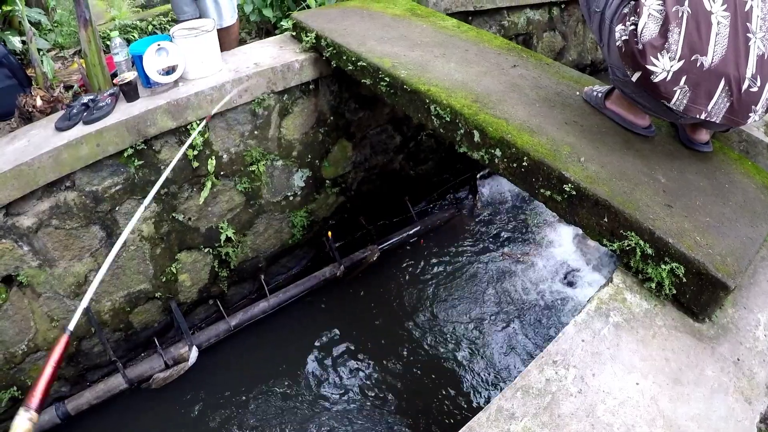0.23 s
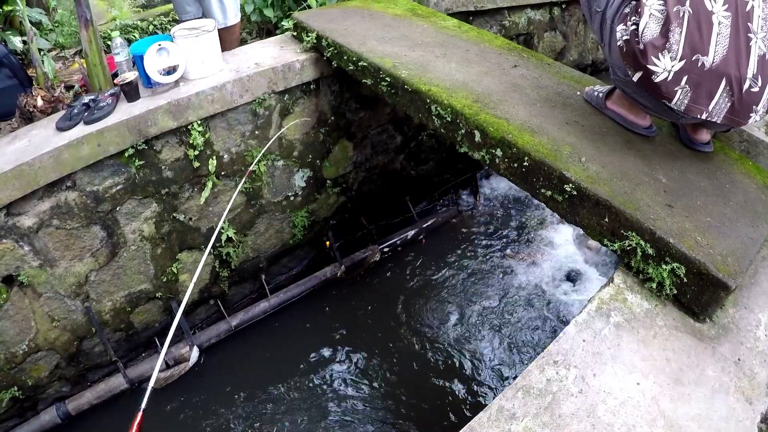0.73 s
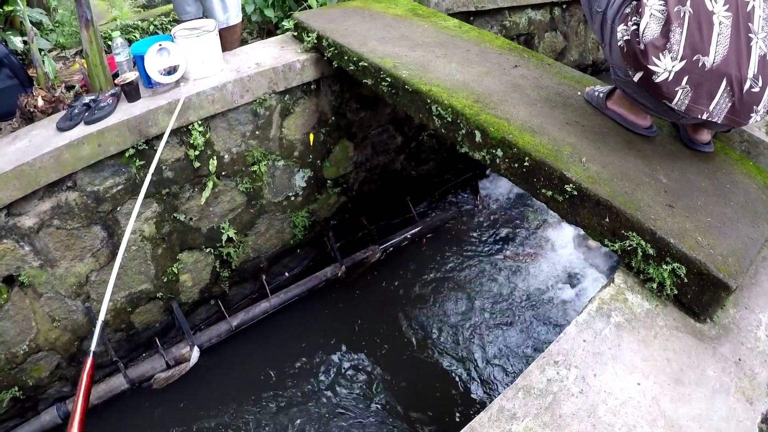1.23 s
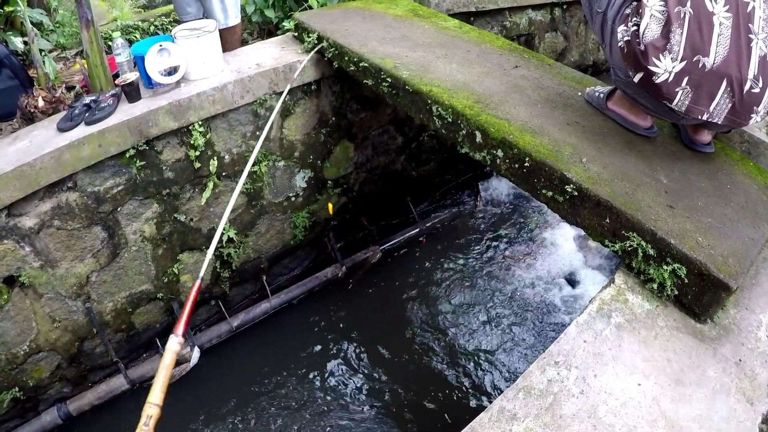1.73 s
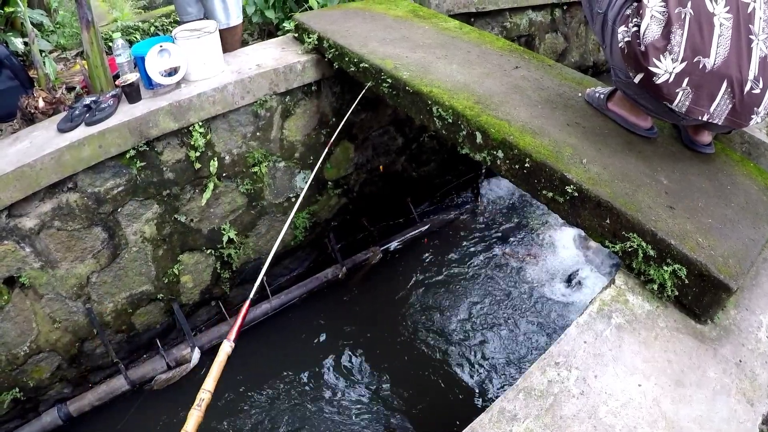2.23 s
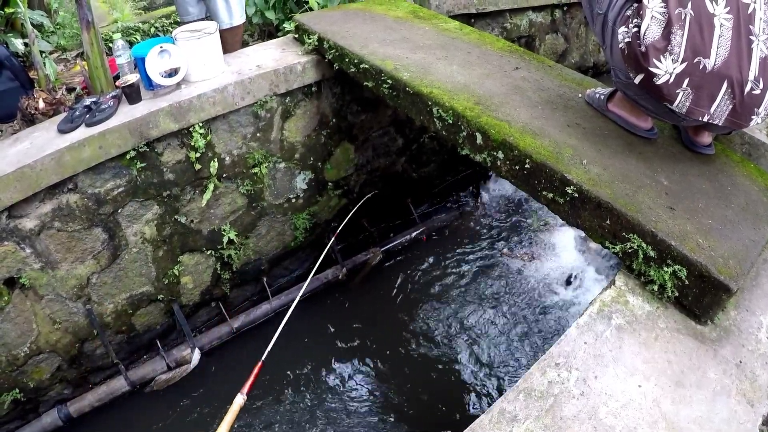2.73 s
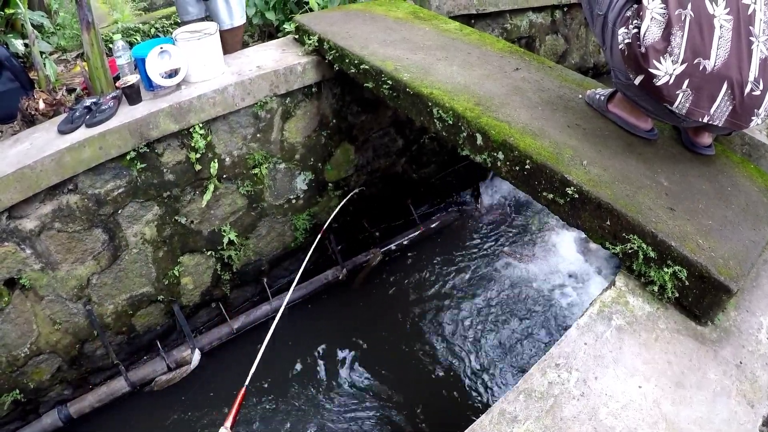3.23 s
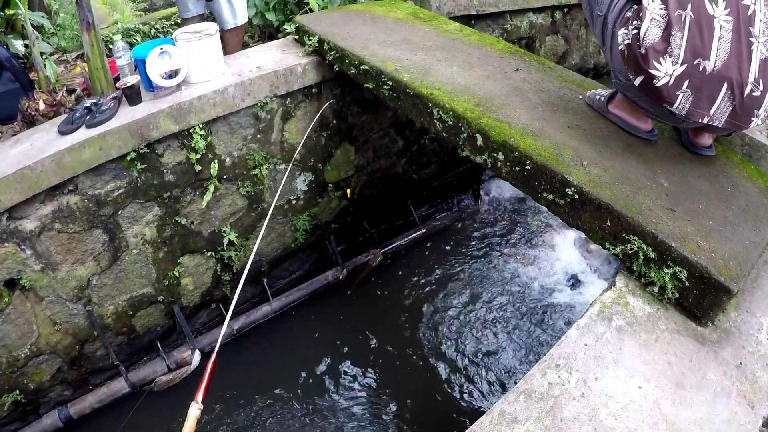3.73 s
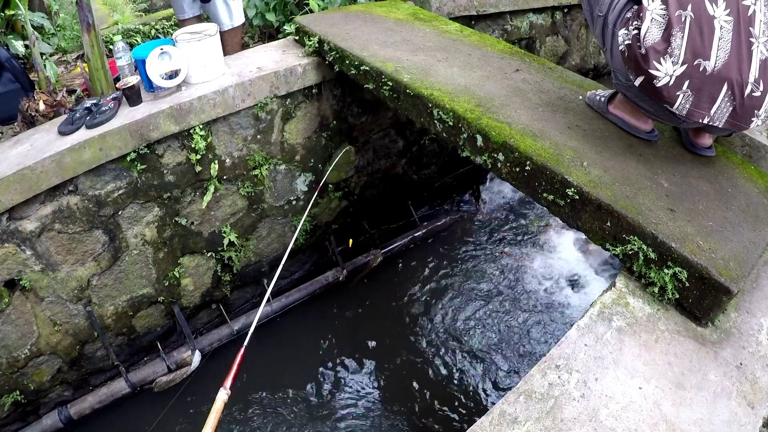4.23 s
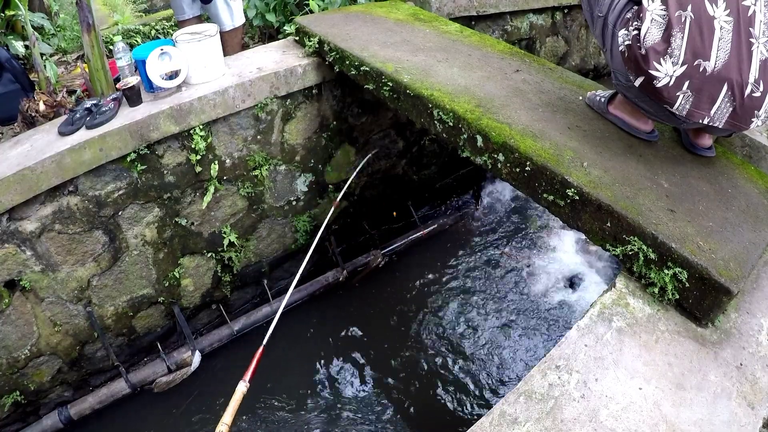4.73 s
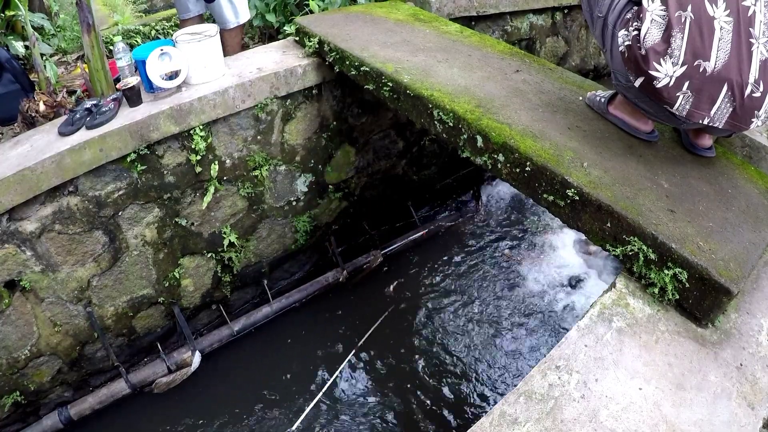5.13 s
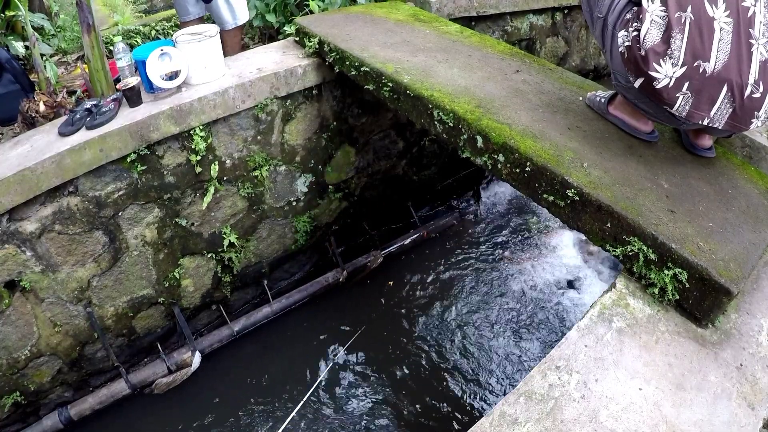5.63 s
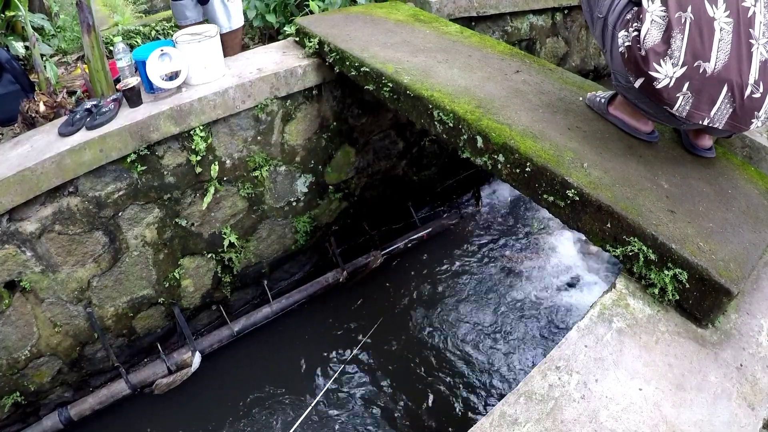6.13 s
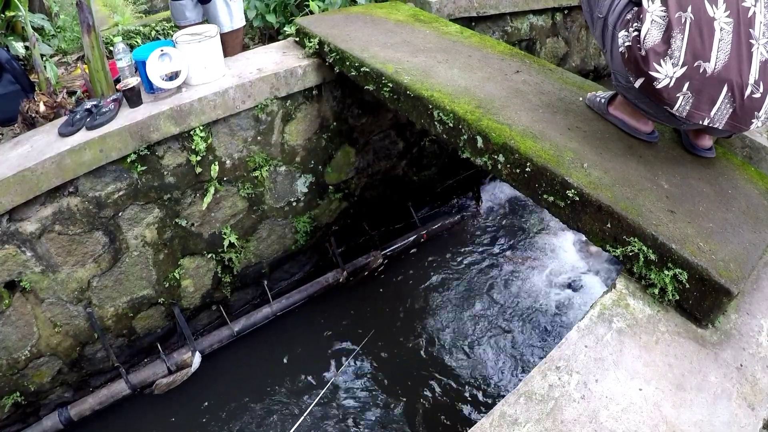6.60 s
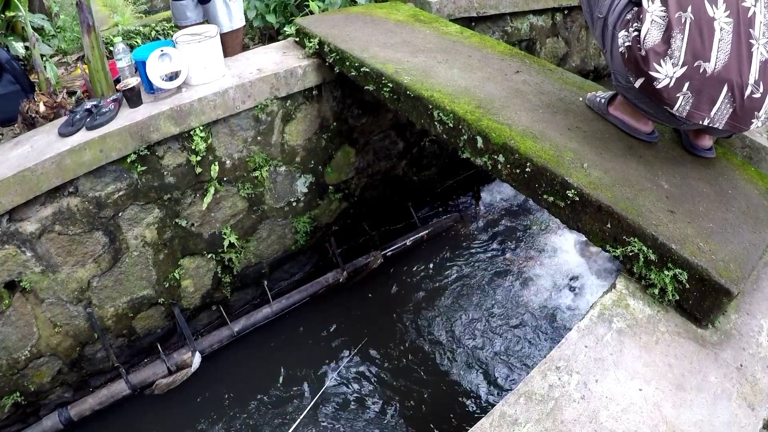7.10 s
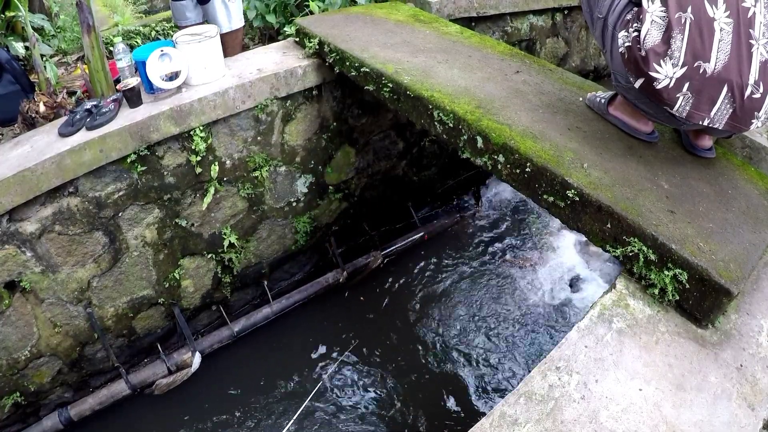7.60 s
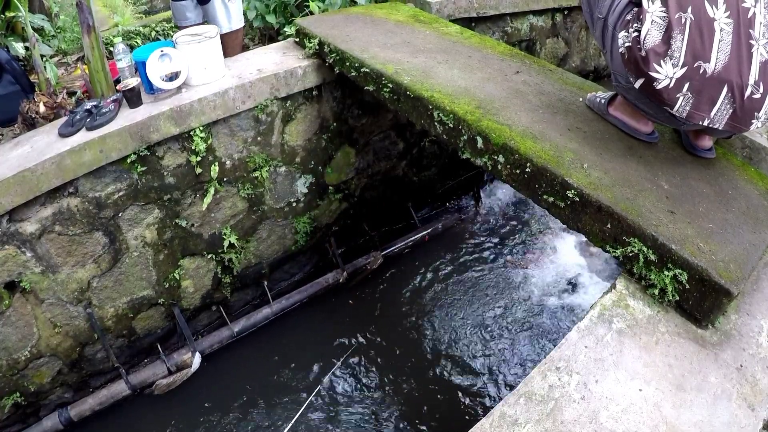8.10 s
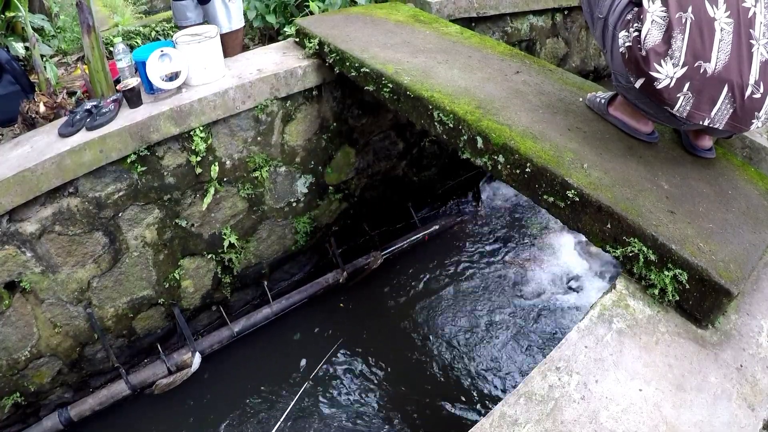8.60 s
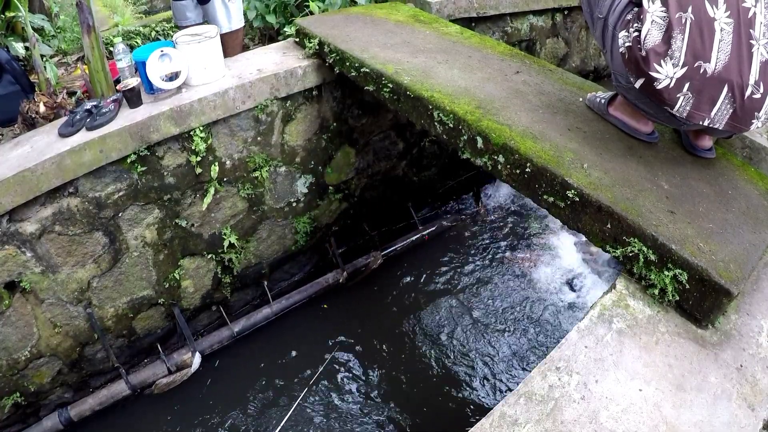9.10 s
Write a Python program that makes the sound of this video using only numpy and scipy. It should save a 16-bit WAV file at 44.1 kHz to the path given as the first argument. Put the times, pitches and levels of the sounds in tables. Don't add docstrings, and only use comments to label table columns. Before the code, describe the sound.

A continuous loud rush of water falls from a culvert into a stone ditch beneath a concrete slab, heard close by from a small camera outdoors. Under it lies a heavy, hollow rumble, strongest around the low bass, wavering and booming irregularly. Above is a dense wash of countless tiny bubbles, churning in soft patches with a slight ring between the walls, and a thin hiss of spray. From 0 to about 0.3 seconds the sound is narrow, centred and a little dull; by 2 to 3 seconds it has opened into a wide, brighter stereo field. The flow builds gently until about 3 seconds, eases near 5, recovers around 6, swells slightly near 8.3 and settles back by 9.3. Booms briefly press the whole level down, and the high end is slightly grainy with tiny gaps. The rush never stops, with no distinct splashes or other sounds.

```python
import sys
import numpy as np
from scipy import signal
from scipy.fft import rfft, irfft
from scipy.io import wavfile
from scipy.ndimage import uniform_filter1d

SR = 44100
rng = np.random.default_rng(int(sys.argv[2]) if len(sys.argv) > 2 else 0)


def persist_wave(psi):
    counts = np.round(np.clip(psi, -1, 1) * 32767).astype(np.int16)
    wavfile.write(sys.argv[1], SR, np.atleast_2d(counts).T)


def linear_from_db(decibels):
    return 10 ** (np.asarray(decibels, float) / 20)


N = 412379
T = np.arange(N) / SR
HZ = np.fft.rfftfreq(N, 1 / SR)

# time_s, level_db
FLOW = [(0, -2.5), (.5, -1.5), (1, -.5), (2, 0), (3.2, .5), (4.2, 0), (5.2, -0.7), (6, 0.4), (7, 0),
        (8.3, 1.1), (9.35, -0.3)]
# pitch_hz, level_db (per Hz)
HOLLOW_COLOUR = [(12, -43), (20, -13), (38, -8), (70, -8), (86, -1), (101, 0), (115, -3), (130, -11),
                 (167, -4), (214, -12), (279, -12), (316, -24), (353, -19), (485, -21), (550, -27),
                 (720, -57), (1210, -120)]
# pitch_hz, width_hz, boost_db
HOLLOW_BOOMS = [(55, 8, 3.5), (72, 6, 2.5), (100, 10, 3.5), (130, 12, 3), (160, 12, 2), (192, 12, 2),
                (290, 12, 2.5), (320, 14, -2), (350, 14, 2), (385, 16, -3)]
# pitch_hz, level_db (per Hz)
RUSH_COLOUR = [(320, -72), (550, -8.5), (638, -7), (726, -7), (788, -6.5), (849, -4), (957, -6), (1190, -8),
               (1670, -5), (1910, -6.5), (2820, -10), (3490, -8), (4350, -14), (5000, -20), (6500, -34.5),
               (11000, -120)]
# pitch_hz, level_db (per Hz)
SPRAY_COLOUR = [(2940, -40), (5000, -11), (6360, -5), (7130, -6), (8270, -14), (10300, -20), (11300, -23.5),
                (12300, -25), (13700, -25.5), (15100, -37)]
# pitch_hz, width_hz, boost_db
WALL_RING = (1660, 110, 2.2)
# pitch_hz, level_db, share_following_mid (-1 to 1), lead_rad
STEREO_SIDE = [(30, -12.5, .95, -2.6), (120, -10, .99, -3), (330, -2.8, .98, -3.8), (510, 4.5, .97, -4.3),
               (680, 14.5, .8, -3.8), (820, 8.5, .86, -3.5), (1050, 3.5, .78, -4.4), (1430, -2, .87, -6),
               (1800, -4.5, .8, -7.5), (2150, -6.5, .27, -8.2), (3100, -7.5, .3, -8.6),
               (3640, -12, .05, -8.6), (5300, -4, .18, -5.4), (7100, 0, .78, -6), (8300, .3, .1, -6.28),
               (9700, .3, -.4, -6.28), (12800, -1, .4, -6.28), (15000, -.5, -.5, -6.28)]
# pitch_hz, width_hz, boost_db
PORTS_ALIKE = (4100, 350, -5)
# pitch_hz, level_db, lead_rad, share_following_mid (0 to 1)
SHELTERED_PORT = [(99, -5.5, 0.3, 0.87), (245, -6, 0.29, 0.83), (493, -3.5, 2.5, 0.74), (648, 6, 0.43, 0.5),
                  (714, -3, 2.5, 0.16), (1150, -1, 6.2, 0.8), (1500, -1, 4.17, 1), (2520, -3, 4.6, 1),
                  (3580, -5.5, 4.15, 0.9), (4700, 1, 6.1, 1), (5850, -4.5, 4.9, 1), (7000, -23.5, 4.1, .5),
                  (8250, -15.5, 14.7, 0.5), (12000, -8, 7.1, 0.6)]
# pitch_hz, level_db
DROP_THRESHOLD = [(1900, -30), (2500, -16), (3500, -11), (4500, -11), (5500, -30), (8500, -20), (10000, -4),
                  (11200, 2.5), (12300, -.5), (14300, 2), (15200, 3)]


def evened(x):
    return x / np.sqrt(np.mean(x ** 2) + 1e-20)


def read(table, order):
    columns = np.transpose(table)
    return np.interp(np.log(HZ + 1), np.log(columns[0] + 1), columns[order])


def coloured(x, table):
    return irfft(rfft(x) * linear_from_db(read(table, order=1)), N)


def bump(hz, width, db):
    return linear_from_db(db * np.exp(-((HZ - hz) / width) ** 2))


def flow_db(usual_db, follows):
    return usual_db + follows * np.interp(T, *np.transpose(FLOW))


def held(x, ceiling_db):
    power = signal.oaconvolve(x[0] ** 2, np.hanning(800) / 400, "same")
    swing = np.sqrt(abs(power)) / linear_from_db(ceiling_db)
    return x / (1 + swing ** 3) ** .12


def rumble():
    air = rfft(coloured(rng.standard_normal((2, N)), HOLLOW_COLOUR))
    booms = np.prod([bump(*mode) for mode in HOLLOW_BOOMS], axis=0)
    booming = held(evened(irfft(air * booms, N)), ceiling_db=3.5)
    return linear_from_db(flow_db(-18, follows=0.67)) * evened(booming)


def bubbles(per_s, cycles, spread_db, rise):
    swarm = np.zeros((2, len(HZ)), complex)
    t = np.arange(400) / SR
    for hz in np.geomspace(450, 15000, num=36):
        turns = hz * t * (1 + rise * hz * t / cycles)
        ring = np.sin(2 * np.pi * turns) * np.exp(-3 * hz * t / cycles)
        births = rng.random((2, N)) < per_s * hz / 1000 / SR
        size = births * linear_from_db(spread_db * np.minimum(rng.exponential(1, N), 5))
        swarm += rfft(size - size.mean()) * rfft(ring * hz ** .5, N)
    smooth = np.sqrt(uniform_filter1d((abs(swarm) ** 2).mean(0), size=2000))
    return irfft(swarm / (smooth + 1e-9), N)


def churned(x, patch_db, surge_db):
    z = signal.stft(x, nperseg=512, noverlap=384)[2]
    field = rng.standard_normal(z.shape[:0:-1]).T
    patches = uniform_filter1d(field, size=9, axis=0)
    patches = evened(uniform_filter1d(patches, size=22, axis=1))
    surge = evened(uniform_filter1d(uniform_filter1d(field[0], size=16), size=10))
    gain = linear_from_db(patch_db * patches + surge_db * surge)
    return signal.istft(z * gain, nperseg=512, noverlap=384)[1][:, :N]


def rush():
    swarm = bubbles(per_s=450, cycles=5.95, spread_db=2.0, rise=0.04)
    water = churned(swarm, patch_db=0.56, surge_db=0.26)
    water = irfft(rfft(water) * bump(*WALL_RING), N)
    spray = linear_from_db(-5) * coloured(water, SPRAY_COLOUR)
    return linear_from_db(flow_db(-30.5, follows=1)) * evened(coloured(water, RUSH_COLOUR) + spray)


def scene():
    return linear_from_db(4.0) * rumble() + linear_from_db(3.6) * rush()


def port(field, table, lead, share):
    share = np.clip(share, -1, 1)
    straight = share * np.exp(1j * lead) * field[0]
    scattered = np.sqrt(1 - share ** 2) * field[1]
    return (straight + scattered) * linear_from_db(read(table, order=1))


def levelled(pair):
    hold_db, share_removed, look_s = -16, 0.27, 0.02
    r = np.exp(-1 / (look_s * SR))
    power = signal.lfilter([1 - r], [1, -r], (pair ** 2).mean(0))
    excess_db = np.maximum(10 * np.log10(power + 1e-9) - hold_db, 0)
    return pair / linear_from_db(share_removed * excess_db)


def perforated(x):
    frame_start, stereo_start_s = 476, 0.5
    frames = dict(fs=SR, window="cosine", nperseg=2048, noverlap=1024)
    hz, t, z = signal.stft(np.roll(x, -frame_start, axis=1), **frames)
    power = uniform_filter1d(abs(z) ** 2, size=3, axis=1)
    usual = uniform_filter1d(uniform_filter1d(power[0], size=25, axis=0), size=5, axis=1)
    threshold_db = np.interp(hz, *np.transpose(DROP_THRESHOLD), left=-99)
    bar = usual * linear_from_db(threshold_db)[:, None] ** 2
    keep = (power > bar) | (t < stereo_start_s)
    return np.roll(signal.istft(z * keep, **frames)[1][:, :N], frame_start, axis=1)


def top_cut(x):
    return signal.sosfilt(signal.butter(12, 15210, fs=SR, output="sos"), x)


def record(dry):
    fade_start_s, fade_s = 0.23, 0.78
    field = rfft(dry)
    side = port(field, STEREO_SIDE, lead=read(STEREO_SIDE, order=3), share=read(STEREO_SIDE, order=2))
    side = irfft(side * bump(*PORTS_ALIKE), N)
    sheltered = port(field, SHELTERED_PORT, lead=read(SHELTERED_PORT, order=2),
                     share=read(SHELTERED_PORT, order=3))
    opened = 1 - np.exp(-np.maximum(T - fade_start_s, 0) / fade_s)
    mid = opened * dry[0] + (1 - opened) * irfft(sheltered, N)
    side = opened * side
    pair = levelled(np.array([mid + side, mid - side]))
    left, right = pair / (1 + (pair / .95) ** 6) ** (1 / 6)
    mid, side = perforated(np.array([left + right, left - right]) / 2)
    return top_cut(np.array([mid + side, mid - side]))


dry = scene()
out = record(dry)
persist_wave(out)
```